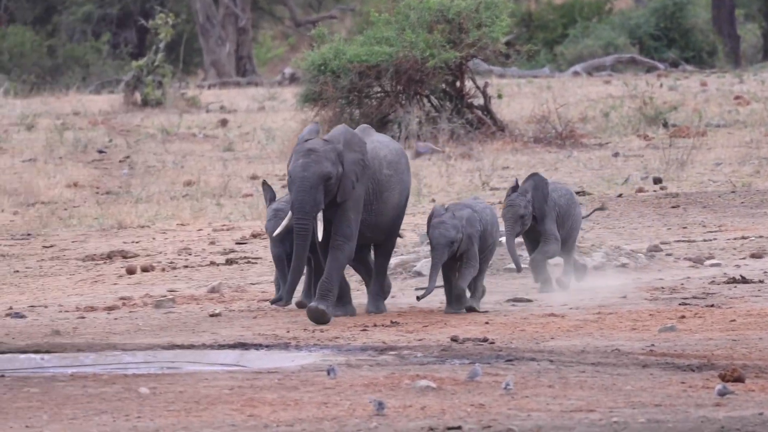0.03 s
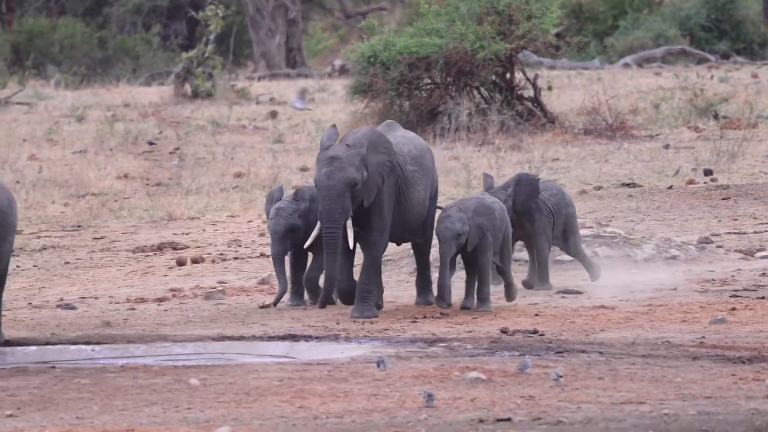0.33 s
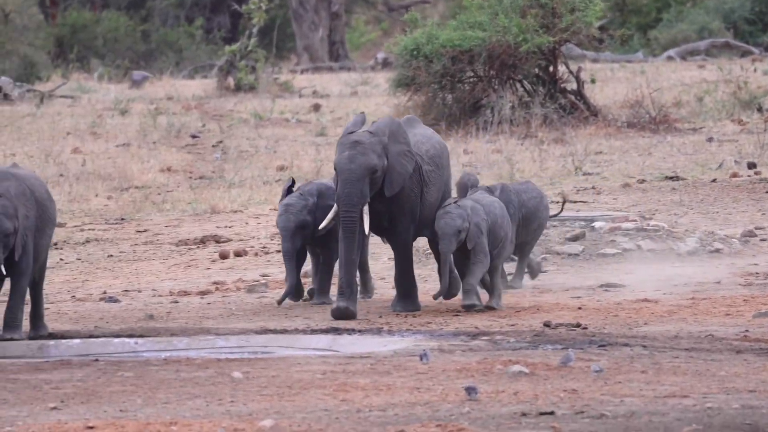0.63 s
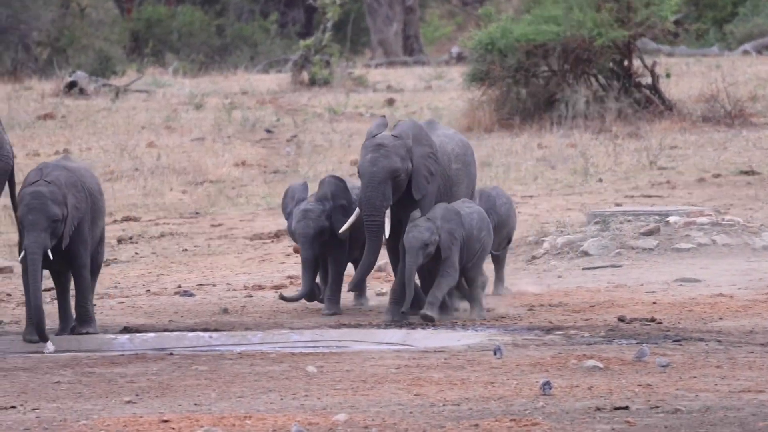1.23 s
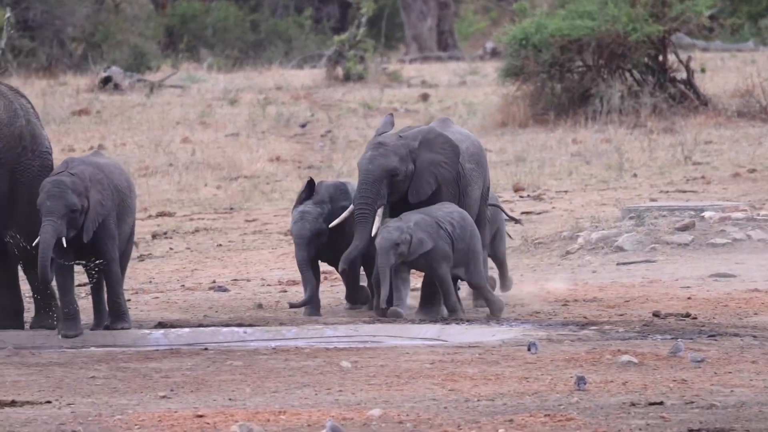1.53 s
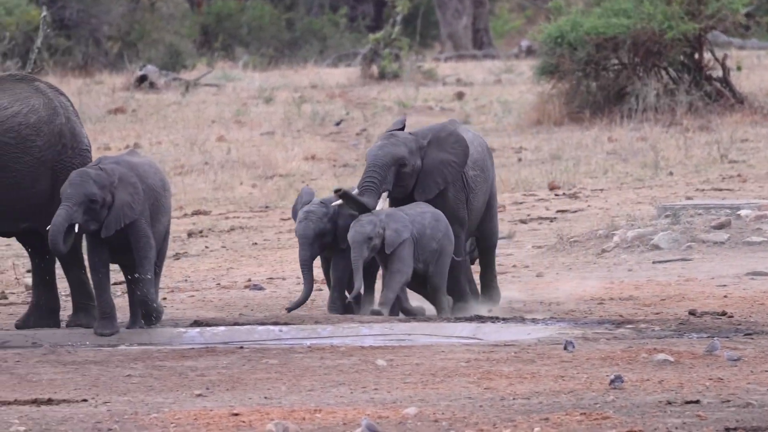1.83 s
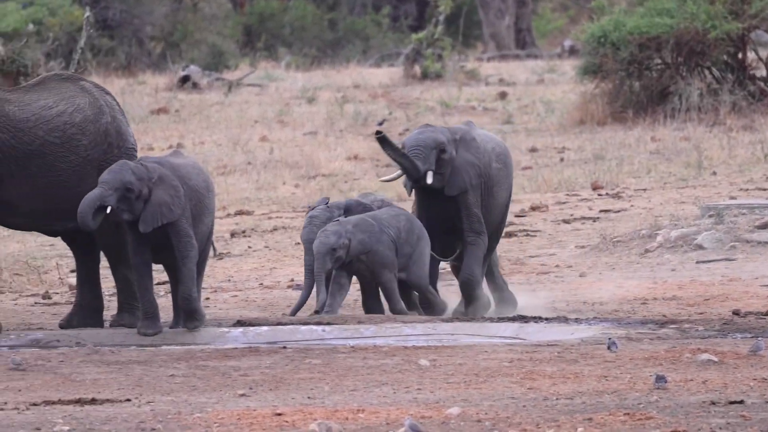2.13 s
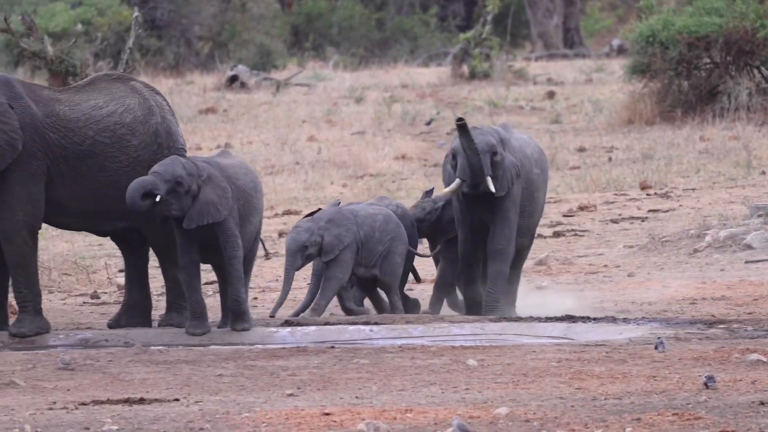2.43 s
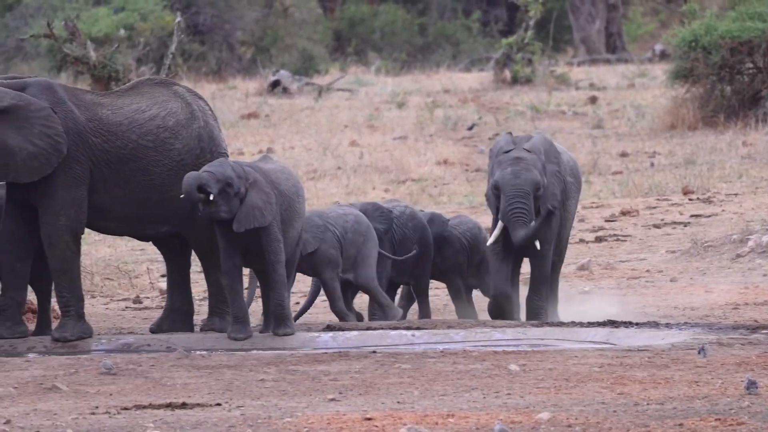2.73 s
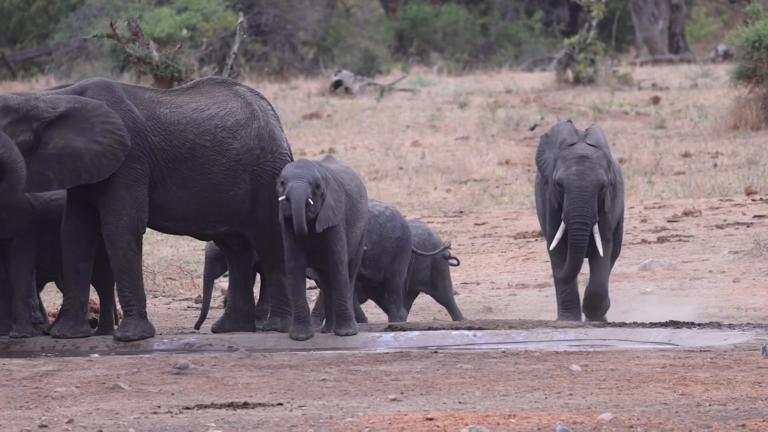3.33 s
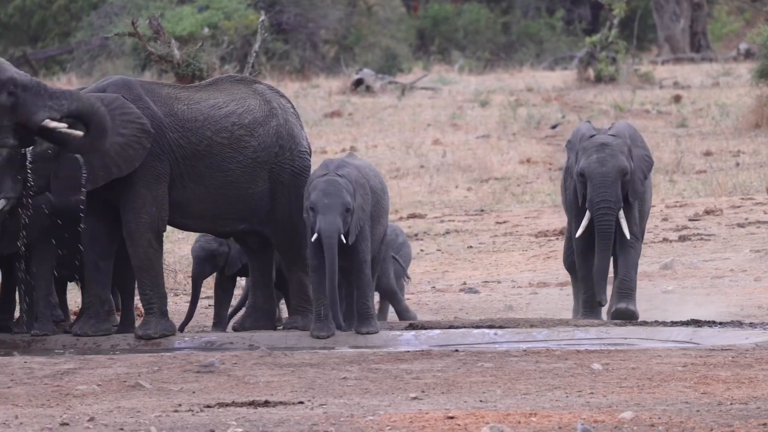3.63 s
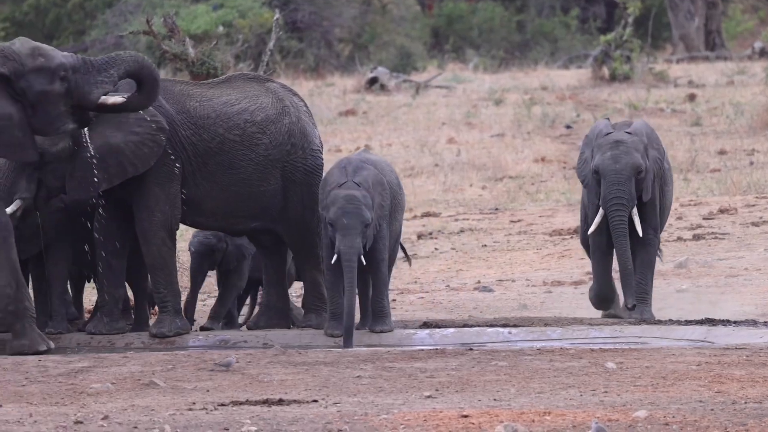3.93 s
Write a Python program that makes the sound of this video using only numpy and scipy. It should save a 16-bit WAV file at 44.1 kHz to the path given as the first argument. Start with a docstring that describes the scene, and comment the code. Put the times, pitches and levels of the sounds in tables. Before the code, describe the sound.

Uneven wind gusts buffet the microphone over faint hiss, with one sharp handling knock.

```python
"""Wind at a dusty waterhole

Uneven gusts buffet a microphone; the harder the air blows, the faster and brighter its eddies (swirls).
Behind them lie a faint hiss, far doves and small birds, and a few scuffs. The camera takes one sharp
handling knock. The strongest buffets make a limiter turn everything down, so the hiss sinks and recovers.
"""
import sys
import numpy as np
from scipy import signal
from scipy.fft import rfft, irfft
from scipy.io import wavfile
from scipy.ndimage import uniform_filter1d, minimum_filter1d, map_coordinates

SR = 44100
rng = np.random.default_rng(int(sys.argv[2]) if len(sys.argv) > 2 else 0)


def wav_record(signal):
    """Record a signal, one row per channel, as 16-bit PCM in the file named by sys.argv[1]."""
    frames = np.transpose(np.atleast_2d(signal))
    bounded = np.clip(frames, -1, 1)
    # unit amplitude maps onto the largest positive 16-bit level
    quanta = np.round(bounded * 32767).astype(np.int16)
    wavfile.write(sys.argv[1], SR, quanta)


N = 176400
T = np.arange(N) / SR


def from_db(db):
    """Turn decibels into a number to multiply by."""
    return 10 ** (np.asarray(db) / 20)


def rms_one(x):
    """Scale a signal so that its average strength (rms) is 1."""
    return x / np.sqrt(np.mean(x ** 2) + 1e-20)


def curve(rows):
    """Join (time, value) rows by straight lines."""
    return np.interp(T, *np.transpose(rows))


def coloured(spectrum, size=N):
    """Noise of strength 1, its tone shaped by rows of f/Hz, level/dB."""
    hz, db = np.transpose(spectrum)
    f = np.maximum(np.fft.rfftfreq(size, 1 / SR), 1)
    gain = from_db(np.interp(np.log(f), np.log(hz), db))
    fade_ends = np.minimum(f / hz[0], 1) * np.minimum(hz[-1] / f, 1) ** 2
    return rms_one(irfft(rfft(rng.standard_normal(size)) * gain * fade_ends, size))


def band_noise(edges_hz):
    """Noise of strength 1, mostly between two frequencies."""
    band = signal.butter(2, edges_hz, "band", fs=SR, output="sos")
    return rms_one(signal.sosfilt(band, rng.standard_normal(N)))


def drift(rate_hz):
    """Smooth random wandering with a typical size of 1."""
    f = np.fft.rfftfreq(N, 1 / SR)
    keep_slow = np.exp(-.5 * (f / rate_hz) ** 2)
    return rms_one(irfft(rfft(rng.standard_normal(N)) * keep_slow, N))


def swell(centre, length, squareness=2):
    """A rounded rise and fall that stays above half height for the given length."""
    out = np.zeros(N)
    near = np.abs(T - centre) < 2 * length
    out[near] = .5 ** (np.abs(2 * (T[near] - centre) / length) ** squareness)
    return out


def hiss(bands=24):
    """Soft, distant hiss of the open bush; each narrow band of pitch wavers on its own."""
    # tone of the hiss: f/Hz, level/dB
    tone = [(40, 11), (500, -4), (740, -7), (905, 3), (1080, -8), (1620, -3), (1900, -7.5), (2400, -7),
            (3800, -15.5), (5200, -17), (7000, -23.5), (16000, -39.5)]
    # its loudness over time: t/s, level/dB
    loudness = [(0, -49.5), (.35, -47.5), (1, -46), (1.3, -48.5), (2, -47.5), (2.35, -42.5), (2.5, -49.5),
                (4, -48.5)]
    spectrum = rfft(coloured(tone))
    f = np.fft.rfftfreq(N, 1 / SR)
    band_number = np.interp(np.log(f + 1), np.log([600, 10000]), [0, bands - 1])
    out = np.zeros(N)
    for k in range(bands):
        share = np.maximum(1 - np.abs(band_number - k), 0)
        waver_db = 3 * drift(rate_hz=14.8)
        out += irfft(spectrum * share, N) * from_db(waver_db)
    return rms_one(out) * from_db(curve(loudness))


def birds():
    """Far doves and small birds: each note slides in pitch, and a random flutter makes it rough."""
    # notes: start/s, length/s, first pitch/Hz, last pitch/Hz, level/dB, roughness from 0 to 1
    notes = [(0, 0.043, 4740, 7130, -57.5, 0.8), (.07, 0.11, 377, 390, -49, 0.1),
             (0.093, 0.098, 1430, 1070, -51.5, 0.11), (0.2, 0.12, 377.3, 392, -53, 0),
             (0.294, 0.093, 1560, 1590, -54, .05), (0.868, .1, 3210, 3170, -58.5, 0.01),
             (1.025, 0.052, 880, 910, -48.5, 0.11), (1.9, 0.34, 916, 865.2, -51, 0.54),
             (2.224, 0.16, 868, 869.3, -45, 0.25), (2.904, 0.025, 5292, 5100, -49, 1),
             (3.099, 0.055, 1795, 1319, -46.5, 0.46), (3.697, 0.019, 3900, 5102, -52, 0.87)]
    lift, spread = 0.02, 0.052   # as shares of the pitch: mid-note rise, blur of a rough note
    out = np.zeros(N)
    for start, length, first_hz, last_hz, db, rough in notes:
        progress = np.clip((T - start) / length, 0, 1)
        arch = np.sin(np.pi * progress)
        hz = (first_hz + (last_hz - first_hz) * progress) * (1 + lift * arch)
        whistle = np.sqrt(2) * np.sin(2 * np.pi * np.cumsum(hz) / SR)
        flutter = np.sqrt(1 - rough) + np.sqrt(rough) * drift(spread * first_hz * (1 + rough))
        out += from_db(db) * arch * flutter * whistle
    return out


def wind():
    """Eddies drift over the microphone: stronger flow makes them louder and carries them past faster."""
    # air between gusts: t/s, level/dB
    breeze = [(0, -69.5), (.46, -62.5), (.54, -29.5), (.64, -42.5), (.79, -46), (.85, -21.5), (1, -42.5),
              (1.8, -33), (2.22, -35), (2.45, -29), (2.76, -36), (2.86, -53.5), (2.95, -30.5),
              (3.12, -37.5), (3.44, -25), (3.74, -37.5)]
    # gusts: middle/s, length/s, level/dB, eddy speed factor
    gusts = [(0.523, 0.031, -21, 0.85), (0.676, 0.029, -28.5, 0.79), (0.741, 0.043, -26.5, 0.74),
             (0.895, 0.071, -15.5, 0.93), (1.056, 0.036, -25, 0.7), (1.149, 0.054, -12.5, 0.94),
             (1.201, 0.036, -15, 0.89), (1.296, 0.058, -21, 0.64), (1.369, 0.054, -18.5, 0.56),
             (1.458, 0.026, -17.5, 0.71), (1.5, 0.053, -14.5, 1.003), (1.571, 0.034, -21.5, 0.73),
             (1.647, 0.057, -21, 0.89), (1.71, 0.043, -12.5, 0.96), (1.767, 0.058, -17, 0.88),
             (1.868, 0.063, -14.5, 0.86), (1.936, 0.055, -15.5, 0.88), (2.081, 0.07, -18.5, 0.87),
             (2.314, 0.051, -18, 1.03), (2.387, 0.072, -21, 0.67), (2.511, 0.029, -15.5, 0.87),
             (2.555, 0.028, -16.5, 0.84), (2.677, 0.035, -22, 0.94), (2.904, 0.032, -28, 0.79),
             (2.965, .04, -12, 1), (3.014, 0.03, -20.5, 0.73), (3.064, 0.018, -16.5, 1),
             (3.201, 0.06, -9, 0.68), (3.28, 0.079, -18, 0.94), (3.342, 0.039, -19, 1.036),
             (3.387, 0.041, -17, 1.1), (3.504, 0.071, -16, 1.1), (3.58, 0.057, -12, 1.14),
             (3.644, 0.054, -11.5, 1.12), (3.832, 0.056, -14, 0.92), (3.896, 0.056, -13.5, 0.83),
             (3.968, 0.044, -16, 0.85)]
    # tone of the eddies at speed 1: f/Hz, level/dB
    eddy_tone = [(20, -29.5), (35, -19.5), (55, -4.5), (85, 4), (150, 5.5), (230, 0.5), (350, -8.5),
                 (550, -24.5), (800, -38), (1150, -50.5), (1800, -79.5)]
    reference_db, db_per_doubling = -20, 30   # the speed doubles for each 30 dB above the reference
    breeze_speed, flutter_octaves, flutter_db = 0.74, 0.2022, 5.5
    power = from_db(curve(breeze)) ** 2
    weighted_speed = power * breeze_speed
    for middle, length, db, speed_factor in gusts:
        gust_power = (from_db(db) * swell(middle, length, squareness=2.2)) ** 2
        power += gust_power
        weighted_speed += gust_power * speed_factor
    flow_db = 10 * np.log10(power)
    turbulence = 2 * np.tanh(drift(rate_hz=60.3) / 2)
    octaves = (flow_db - reference_db) / db_per_doubling + flutter_octaves * turbulence
    speed = weighted_speed / power * 2 ** octaves
    eddies = coloured(eddy_tone, size=2 * N)
    # Running through the noise faster raises its pitch.
    pressure = map_coordinates(eddies, [np.cumsum(speed)], order=3, mode="wrap")
    pressure *= from_db(flutter_db * turbulence)
    # Even out the slower swings, so that the flow sets the loudness.
    window = signal.windows.hann(int(0.044 * SR))
    local_power = signal.fftconvolve(pressure ** 2, window / window.sum(), "same")
    return pressure / np.sqrt(local_power + 1e-6) * from_db(flow_db)


def buffets(air):
    """A hard eddy sweeps the smaller ones aside: it sucks, then pushes, within a few milliseconds."""
    # hard eddies that hit the microphone: t/s, peak level/dB
    hits = [(0.8885, -10.5), (1.141, -5.5), (1.1552, 1.5), (1.4809, -9), (1.5126, -6), (1.6593, -14.5),
            (1.6992, 0), (1.7089, -4.5), (1.726, 1.5), (1.8601, -10), (2.3117, -13), (2.5098, -12.5),
            (2.9503, -2.5), (2.9649, -5.5), (2.9792, -0.5), (3.0646, -11.5), (3.1932, -10), (3.2091, -8.7),
            (3.296, -9.5), (3.4961, -8.5), (3.5059, -5.5), (3.519, -3.5), (3.536, -8.5), (3.5763, -1),
            (3.5894, -8), (3.6375, 0.5), (3.8214, -8.5), (3.877, -8), (3.924, -9), (3.9624, -9.5)]
    half_width_s, db_per_halving = 0.0012, 30   # for a 0 dB pulse; one 30 dB stronger is half as long
    thumps = np.zeros(N)
    for when, db in hits:
        offset = (T - when) / half_width_s * 2 ** (db / db_per_halving)
        pulse = offset / (1 + offset ** 2) ** 3
        thumps += from_db(db) * pulse / pulse.max()
        air = air * (1 - swell(when, length=0.0041))
    treble_cut = signal.butter(5, 1390, fs=SR, output="sos")
    return air + signal.sosfiltfilt(treble_cut, thumps)


def scuffs(width_octaves=0.49):
    """Scuffs on dry ground make short puffs of dusty noise."""
    # puffs: middle/s, length/s, centre pitch/Hz, level/dB
    puffs = [(0.956, 0.0056, 3608, -48), (2.039, 0.013, 3236, -49.5), (2.376, 0.058, 4393, -46),
             (3.023, 0.0045, 3170, -49.5), (3.793, .006, 2193, -47)]
    edges = 2 ** (np.array([-.5, .5]) * width_octaves)
    return sum(from_db(db) * swell(middle, length) * band_noise(hz * edges)
               for middle, length, hz, db in puffs)


def knock(start_s=3.3962, rise_s=0.0022):
    """A bright crack that dies fast and leaves the camera body ringing and its casing buzzing faintly."""
    # tone of the crack: f/Hz, level/dB
    tone = [(500, -26), (950, -7), (1350, -10), (1700, -6.5), (2900, -2), (4200, -9), (5500, -13),
            (10500, -22.5), (16000, -18)]
    # ringing notes of the camera body: f/Hz, level/dB, time to fade by 60 dB/s
    body_notes = [(122, -10, 0.082), (946, -41.5, .3), (1543, -38.5, 0.5), (2550, -31.5, 0.1),
                  (3320, -33.5, 0.088), (7682, -51.5, 0.37)]
    age = np.maximum(T - start_s, 0)

    def fade(db, fade_s):
        """Start at the given level and lose 60 dB every fade_s seconds."""
        return from_db(db - 60 * age / fade_s)

    crack = coloured(tone) * fade(db=-20.5, fade_s=0.068)
    ring = sum(fade(db, fade_s) * np.sin(2 * np.pi * hz * age) for hz, db, fade_s in body_notes)
    buzz = band_noise(edges_hz=(1600, 1700)) * fade(db=-42.5, fade_s=1)
    rise = np.minimum(age / rise_s, 1)
    return rise * (crack + ring + buzz)


def scene():
    """Wind and a knock at the microphone, whose opening weakens the wind's bass; the bush far behind."""
    bass_cut = signal.butter(2, 39, "high", fs=SR, output="sos")
    air = signal.sosfilt(bass_cut, buffets(wind()))
    return (air + knock() + hiss() + birds() + scuffs())[None]


def record(dry):
    """A limiter turns peaks above 0 dB down fast and lets go slowly; then the highest treble is cut."""
    attack_s, release_db_per_s = 0.0025, 10.5
    excess_db = np.maximum(20 * np.log10(np.abs(dry[0]) + 1e-9), 0)
    release_db = release_db_per_s * T
    held_db = np.maximum.accumulate(excess_db + release_db) - release_db
    span = int(attack_s * SR)
    gain_db = minimum_filter1d(-held_db, 2 * span)   # turn down just ahead of each peak
    smooth_db = uniform_filter1d(uniform_filter1d(gain_db, span), span)
    treble_cut = signal.cheby2(16, 70, 16500, fs=SR, output="sos")
    return signal.sosfilt(treble_cut, dry * from_db(smooth_db))


dry = scene()
out = record(dry)
wav_record(out)
```